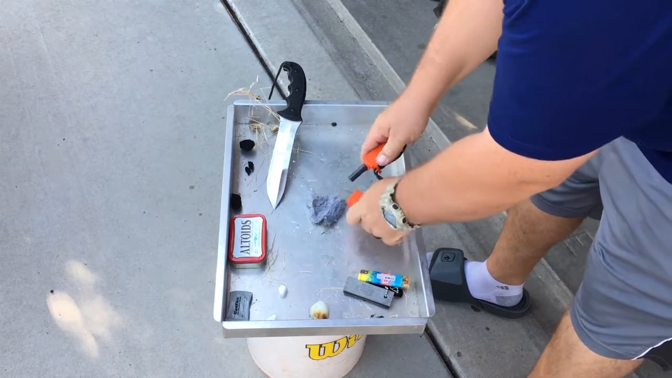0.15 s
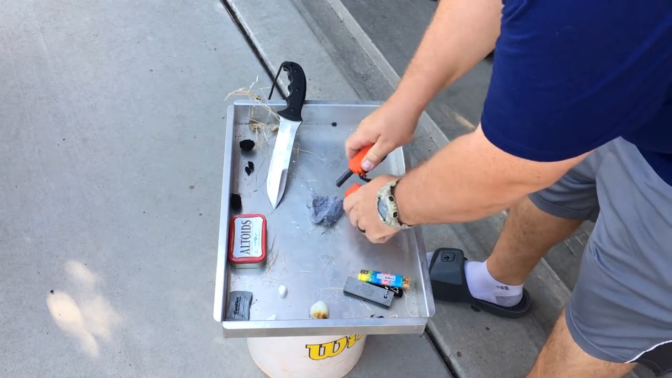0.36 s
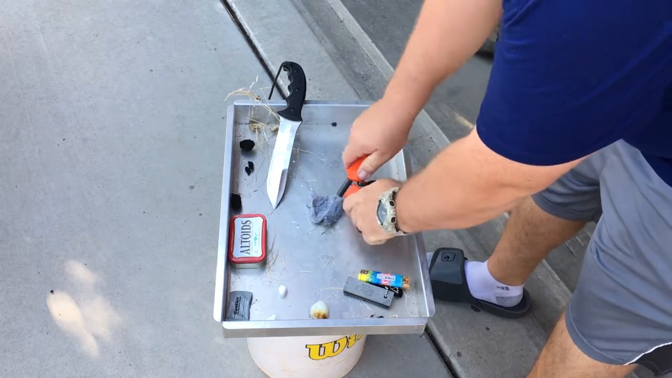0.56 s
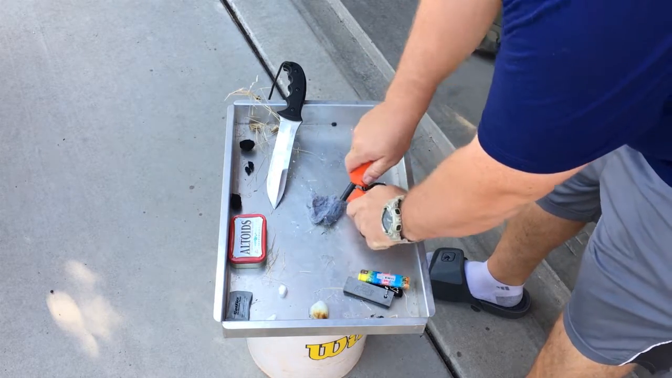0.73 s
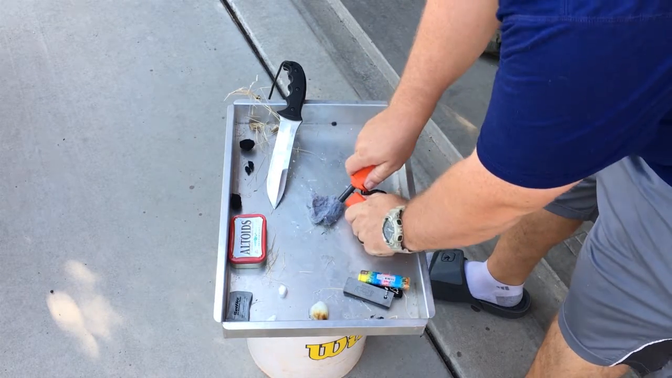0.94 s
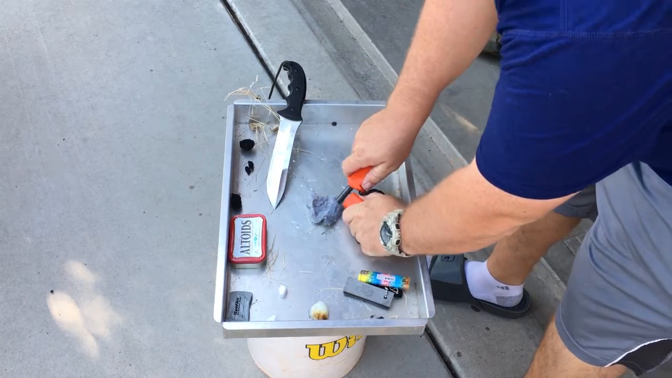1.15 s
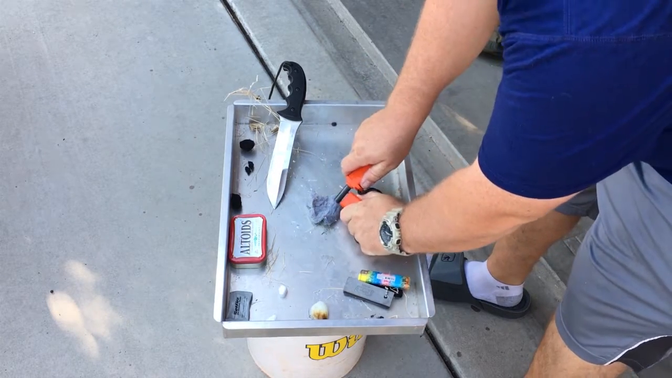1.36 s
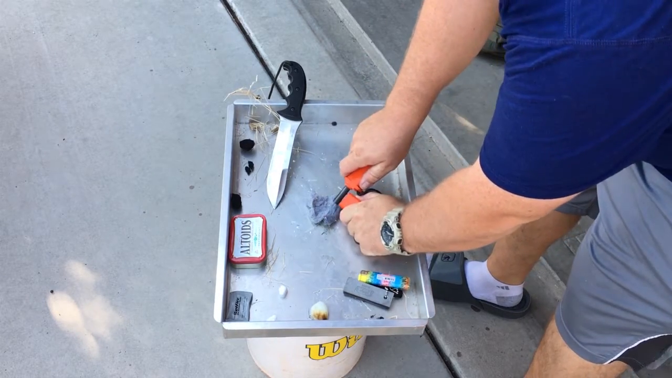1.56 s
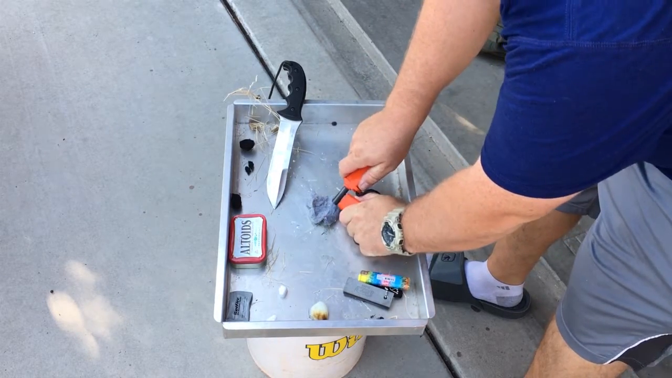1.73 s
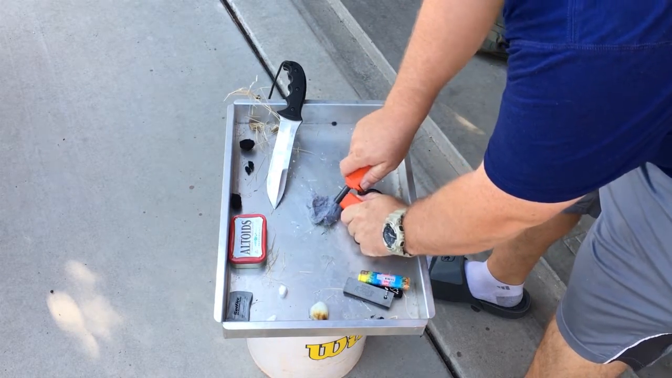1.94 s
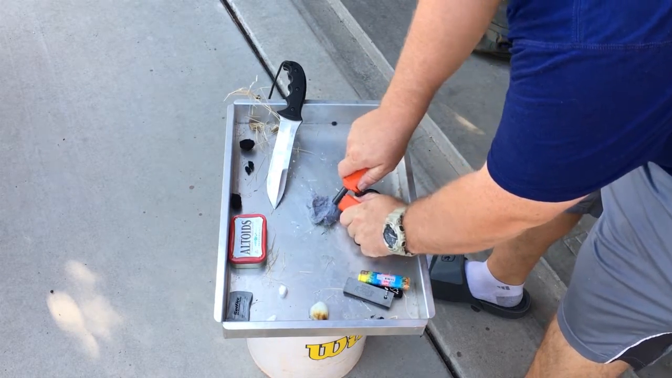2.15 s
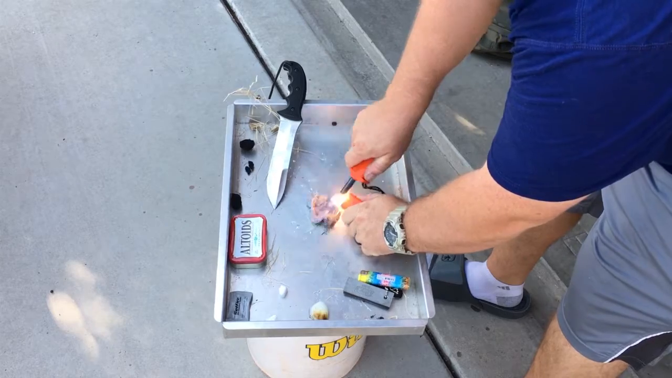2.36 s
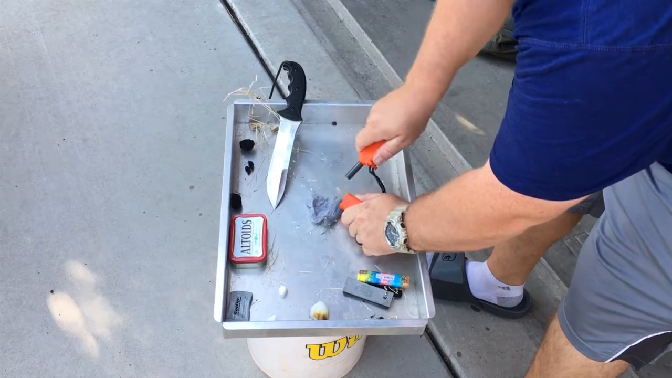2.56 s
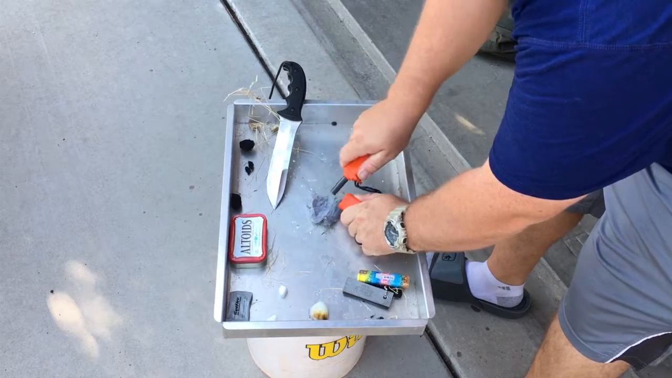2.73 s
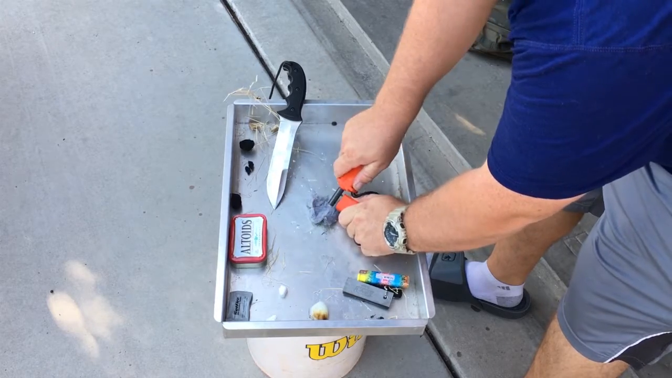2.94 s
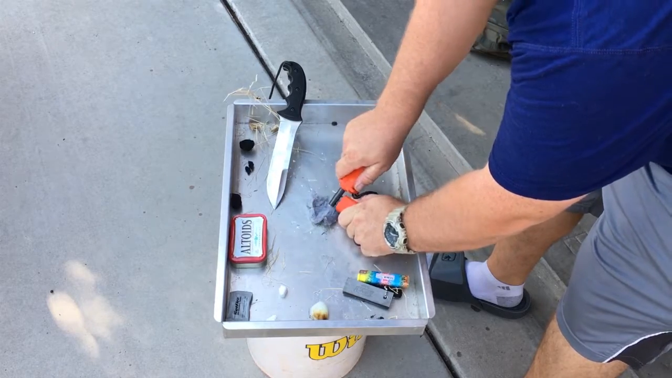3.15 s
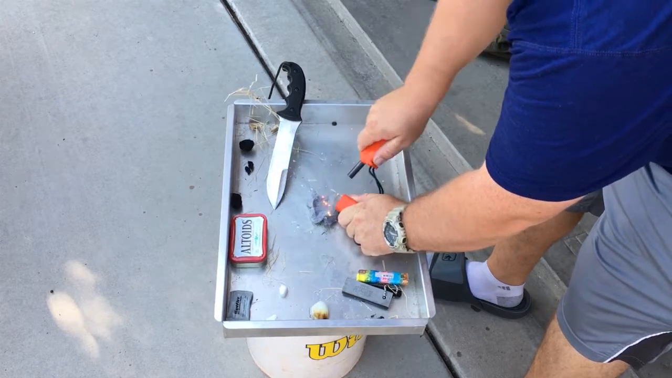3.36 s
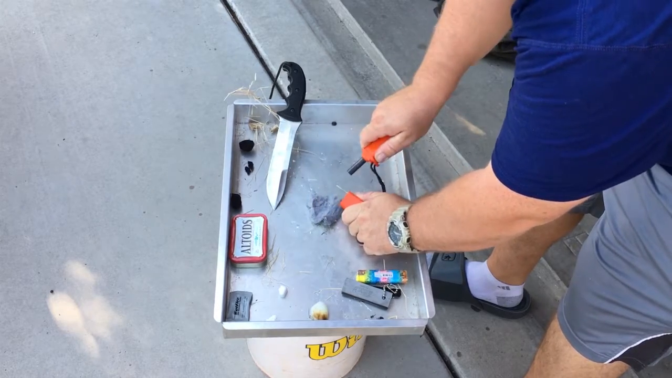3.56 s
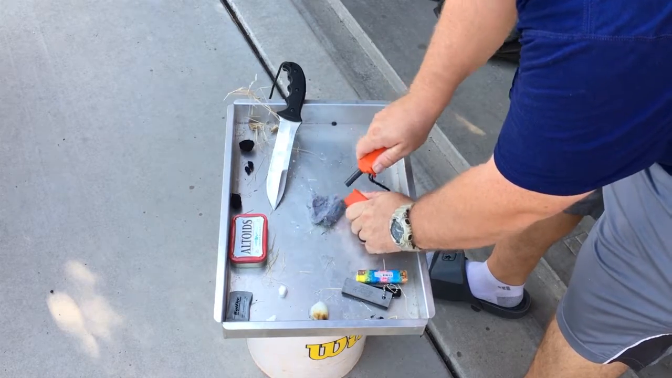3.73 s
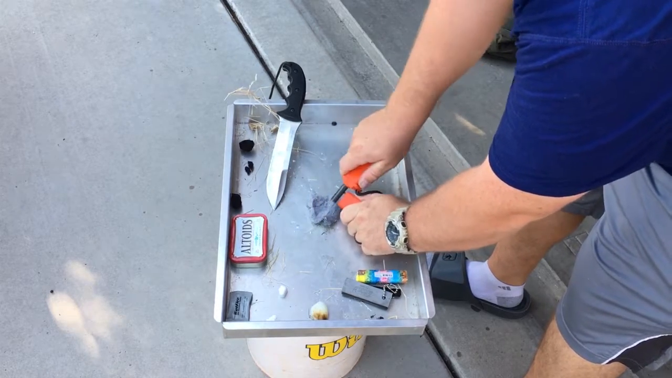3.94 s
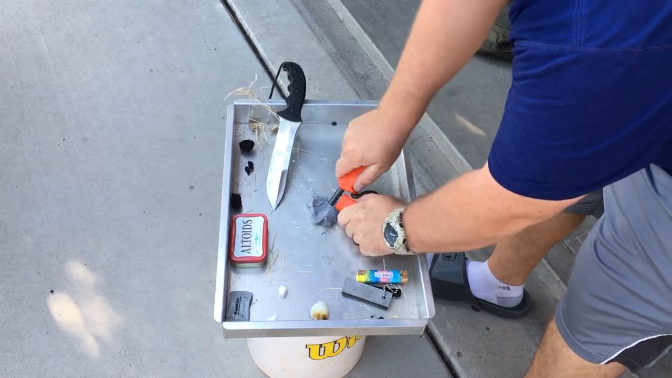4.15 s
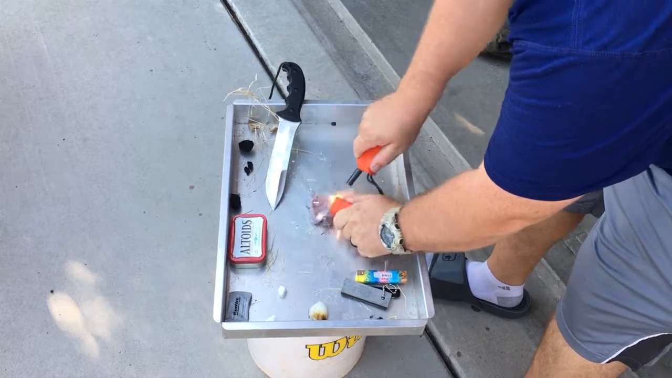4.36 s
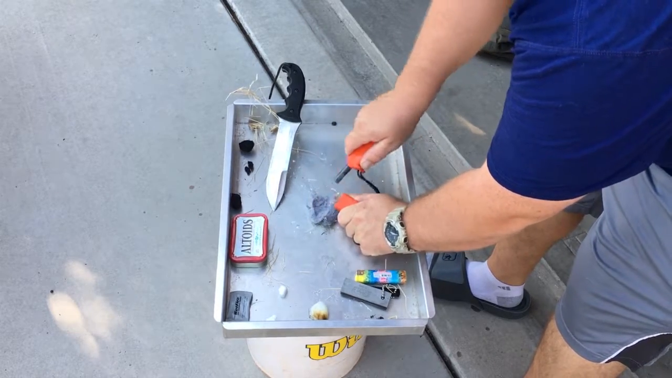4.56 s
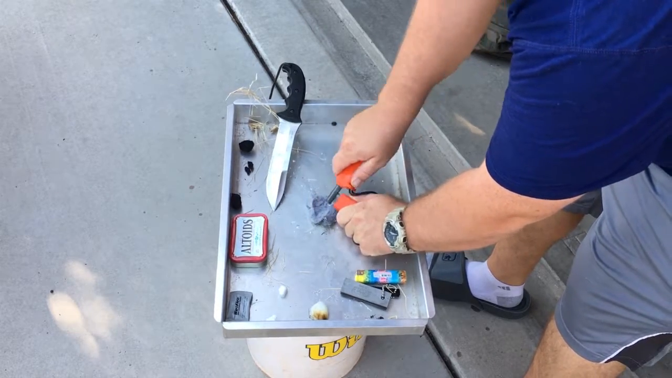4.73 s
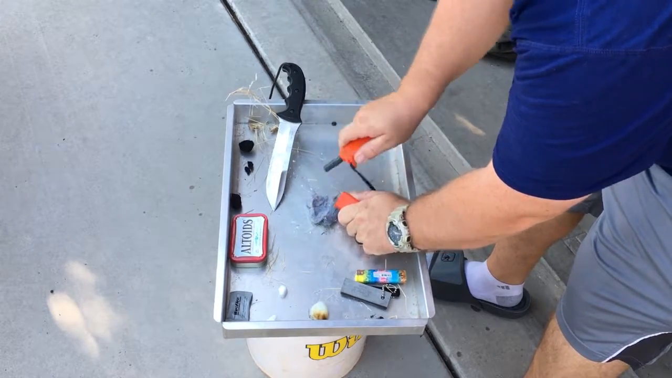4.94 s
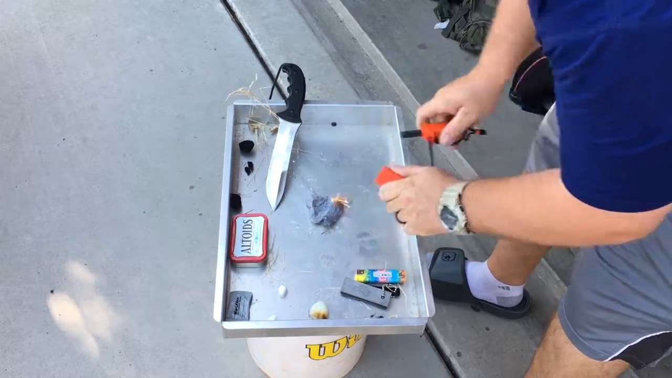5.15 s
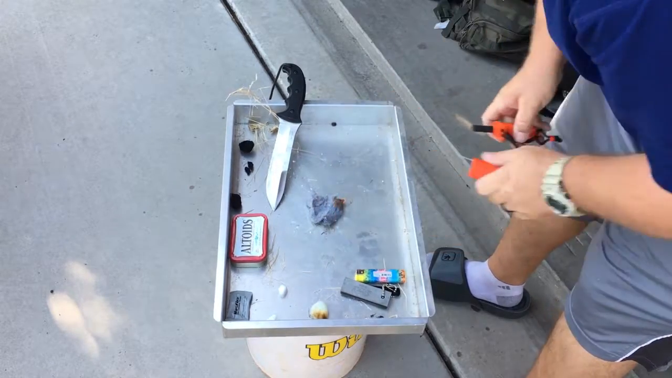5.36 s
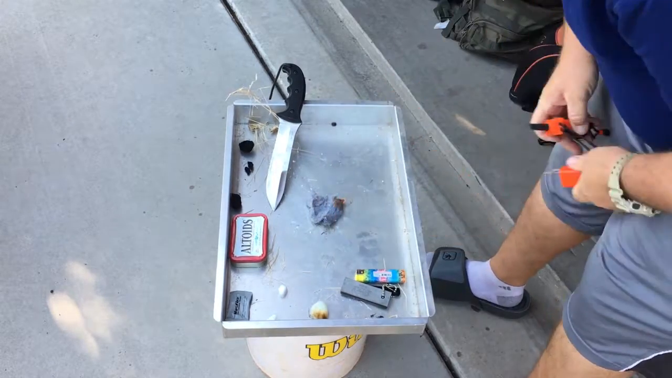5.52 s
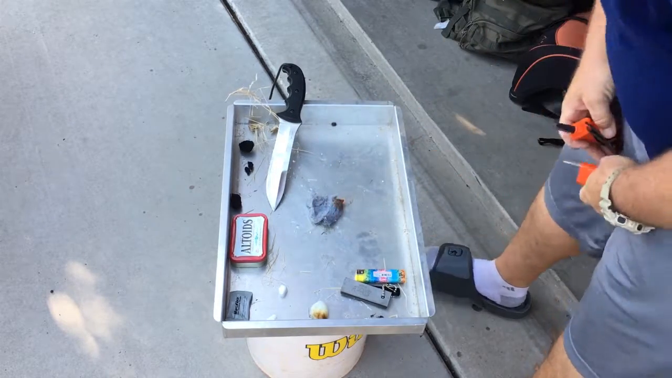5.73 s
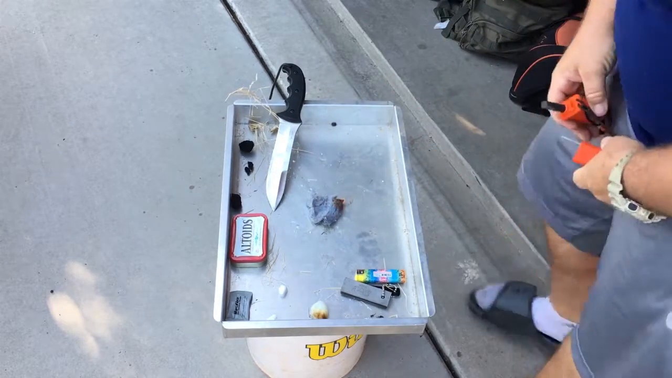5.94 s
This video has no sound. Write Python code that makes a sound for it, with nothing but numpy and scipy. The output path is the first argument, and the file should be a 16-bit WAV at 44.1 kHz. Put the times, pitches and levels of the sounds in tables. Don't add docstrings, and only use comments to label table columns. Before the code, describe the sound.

A blade chatters down a spark rod in three short rasps between sharp plastic knocks, a thin tray thudding softly, faint machine hum behind.

```python
import sys
import numpy as np
from scipy import signal
from scipy.fft import rfft, irfft
from scipy.io import wavfile
from scipy.ndimage import uniform_filter1d

SR = 44100
rng = np.random.default_rng(int(sys.argv[2]) if len(sys.argv) > 2 else 0)


def transcribe(signal):
    frames = np.atleast_2d(signal).T
    limited = np.clip(frames, -1, 1)
    pcm = np.round(limited * 32767).astype(np.int16)
    wavfile.write(sys.argv[1], SR, pcm)


def attenuation_scalar(level_db):
    decades = np.asarray(level_db, float) / 20
    return 10 ** decades


N = 268597


def noise(n):
    return rng.standard_normal(n)


def seconds(length_s):
    return np.arange(int(length_s * SR)) / SR


def unit(x):
    return x / np.sqrt(np.mean(x ** 2))


def peak_unit(x):
    return x / np.abs(x).max()


def colour(x, points):
    hz, db = np.transpose(points)
    bins = np.maximum(np.fft.rfftfreq(len(x), 1 / SR), 1)
    return irfft(rfft(x) * attenuation_scalar(np.interp(np.log(bins), np.log(hz), db)), len(x))


def resonate(x, hz, width_hz):
    return signal.lfilter(*signal.iirpeak(hz, hz / width_hz, SR), x)


def walk(rate):
    k = int(SR / rate)
    held = np.repeat(noise(N // k + 1), k)
    smooth = uniform_filter1d(uniform_filter1d(held, k), k)
    return unit(smooth[:N])


def grains(scatter_db):
    return unit(noise(N) * attenuation_scalar(scatter_db * rng.exponential(size=N)))


def add(out, s, x):
    i = int(s * SR)
    out[..., i:i + x.shape[-1]] += x[..., :N - i]


def ring(x, modes):
    return sum(attenuation_scalar(db + 4.0 * walk(120)) * resonate(x, hz, width) for hz, width, db in modes)


def striker():
    # f/Hz, width/Hz, level/dB
    blade_modes = [(1485, 46, -7), (2320, 105, -8), (3490, 280, -6.5), (4180, 21, -2), (5500, 190, -17),
                   (5770, 65, -8), (6300, 34, -22), (7000, 24, -11), (8310, 480, -8.5), (9080, 47, -4),
                   (9560, 82, 3), (11800, 20, -21)]
    # f/Hz, width/Hz, level/dB
    squeal_modes = [(3740, 84, 0), (4383, 57, 5), (4370, 36, -13)]
    # f/Hz, level/dB
    grit_spectrum = [(590, -52), (1000, -14.5), (1370, -1), (1630, -24), (2940, -10), (4390, -10),
                     (6630, -12), (9700, -10.5), (11700, -12), (12500, -34.5), (16200, -74), (22000, -120)]
    # f/Hz, level/dB
    pressed_spectrum = [(110, -31), (180, -1.5), (421, -11), (688, -10), (973, -6.5), (1450, -6),
                        (2330, -6), (2600, -32), (3380, -41), (5720, -120)]
    # f/Hz, level/dB
    rumble_spectrum = [(150, -28), (230, -6.5), (420, -11.5), (700, -3), (1000, -7), (1500, -12.5),
                       (2400, -11.5), (3500, -45), (6000, -73)]
    force, loose = contact(), brushing()
    grit = grains(1.2)
    hiss = unit(colour(grit, grit_spectrum)) * attenuation_scalar(1.5 * walk(200))
    blade = hiss + attenuation_scalar(6.5) * unit(ring(grit, blade_modes))
    out = force[3] * unit(ring(grit, squeal_modes))
    for k, gain_db, kind in ((0, -1.5, "low"), (1, 0.1, "high")):
        split = signal.butter(N=4, Wn=7000, btype=kind, fs=SR, output="sos")
        scrape = force[k] * unit(signal.sosfilt(split, blade))
        rustle = loose[k] * unit(signal.sosfilt(split, hiss))
        out += attenuation_scalar(gain_db) * (scrape + rustle)
    pressed = force[2] * attenuation_scalar(2.4 * walk(70)) * unit(colour(grains(1.9), pressed_spectrum))
    rumble = loose[2] * attenuation_scalar(3.3 * walk(60)) * unit(colour(grains(0.99), rumble_spectrum))
    return out + slips() + pressed + rumble


def contact():
    # start t/s, end t/s, first level/dB, last level/dB, squeal level/dB
    strokes = [
        (2.412, 2.489, -47.5, -38, 2.5),
        (3.324, 3.39, -44.5, -37.5, 0.5),
        (4.332, 4.362, -48, -56, -2),
        (4.368, 4.43, -40.5, -36.5, -2.5),
    ]
    # t/s, level/dB, tray level/dB, length/s
    touches = [(2.211, -65, -12, 0.031), (2.241, -58, -14, 0.0051), (2.264, -56, -5.5, 0.0093),
               (2.287, -59, -13, 0.012), (2.581, -63, 13, 0.0041), (3.068, -65, -5, .008),
               (3.107, -70, -8, 0.0051), (3.12, -66, -1.5, 0.019), (3.183, -55.5, -5, 0.0094),
               (3.202, -61, -5, 0.013), (3.227, -59, -7, 0.012), (3.591, -73, -10, 0.0046),
               (4.138, -61.5, 1, 0.009), (4.156, -58.5, -9, 0.011), (4.186, -61, -8, 0.024),
               (4.318, -67, -1, 0.0085), (5.034, -69, -8, 0.0067), (5.258, -67, -7, 0.027),
               (5.428, -70, -16, 0.0044), (5.807, -58, -16, 0.0023), (5.815, -69, -7, .012)]
    bite_s = 0.0038
    force = np.zeros((4, N))
    for start, end, first_db, last_db, squeal_db in strokes:
        along = np.linspace(0, 1, int((end - start) * SR))
        top_db = -9 + 5 * along
        tray_db = -15.5 + 10 * along
        fading_squeal_db = squeal_db - 7 * along ** 1.9
        parts_db = np.array([0 * along, top_db, tray_db, fading_squeal_db])
        stroke_db = first_db + (last_db - first_db) * along
        bite = np.minimum(along * (end - start) / bite_s, 1)
        add(force, start, bite * attenuation_scalar(stroke_db + parts_db))
    force = uniform_filter1d(force, size=41, axis=1) * attenuation_scalar(1.6 * walk(130))
    for s, db, tray_db, length in touches:
        t = seconds(length + 0.011)
        shape = np.minimum(t / 0.00048, 1) * np.exp(-np.maximum(t - length, 0) / 0.0013)
        parts_db = np.array([0, -11.5, tray_db, -5.5])[:, None]
        add(force, s, attenuation_scalar(db + parts_db) * shape)
    return force


def brushing():
    # t/s, rustle level/dB, tray level/dB, time to fade by 60 dB/s
    brushes = [(2.489, -49, -2.5, 0.23), (2.578, -58.5, 7, 0.12), (3.39, -47, 1, 0.17),
               (3.453, -46, -2.5, 0.12), (3.487, -61.5, 4, 0.14), (3.525, -65, -3, 0.14),
               (4.431, -46, 2.5, 0.15), (4.478, -54, -1, 0.33)]
    loose, t = np.zeros((3, N)), seconds(.3)
    for s, db, tray_db, t60 in brushes:
        fall = -60 * t / t60
        parts_db = np.array([fall, -16.5 + fall, tray_db + fall / 1.31])
        add(loose, s, np.minimum(t / 0.0036, 1) * attenuation_scalar(db + parts_db))
    return loose


def slips():
    # t/s, peak level/dB, centre f/Hz, width/Hz
    slip_events = [
        (2.4827, -20, 6700, 3910),
        (3.384, -28, 6400, 4000),
        (4.4255, -21.5, 5620, 2500),
    ]
    out, t = np.zeros(N), seconds(0.033)
    for s, db, hz, width in slip_events:
        crack = resonate(noise(len(t)) * np.exp(-(t / 0.0029) ** 2), hz, width)
        crack = resonate(crack, hz, 0.84 * width)
        add(out, s, attenuation_scalar(db) * peak_unit(crack))
    return out


def snaps():
    # t/s, peak level/dB, hollow level/dB, shell level/dB, thin edge level/dB
    knocks = [
        (0.497, -12.5, 0, -2, -2),
        (2.9233, -11, -1, -0.5, 2),
        (3.9591, -15, 1.5, 1.5, 1),
        (4.861, -15, -2.5, 0, 0.5),
    ]
    # f/Hz, width/Hz, level/dB, share in the echo/dB
    handle_parts = [
        (2050, 700, -9, -2),
        (3650, 520, -5.5, -1.5),
        (6800, 1300, -0.5, -4),
        (9250, 1200, -5, -12),
    ]
    out, t = np.zeros(N), seconds(.4)
    chatter = np.exp(-np.maximum(t - .0006, 0) / .00045) + attenuation_scalar(-8) * np.exp(-t / .0028)
    push = np.minimum(t / .0003, 1) * chatter
    click = attenuation_scalar(13.5) * signal.unit_impulse(len(t), idx=24)
    fade = attenuation_scalar(-27 - 60 * t / 0.26) * np.clip(t / 0.00223, 0, 1)
    soft = signal.butter(N=8, Wn=10100, fs=SR, output="sos")
    for s, peak_db, hollow_db, shell_db, edge_db in knocks:
        crack = resonate(resonate(push * noise(len(t)), 5800, 6000), 5800, 7000)
        knock = attenuation_scalar(-9.5) * peak_unit(crack)
        smear = attenuation_scalar(-14.5) * unit(resonate(noise(len(t)), 5500, 6000))
        grips_db = (hollow_db, shell_db, 0, edge_db)
        for (hz, width, own_db, wet_db), grip_db in zip(handle_parts, grips_db):
            db = own_db + grip_db
            part = resonate(click + push * noise(len(t)), hz, 1.3 * width)
            part = resonate(part, hz, 1.3 * width)
            knock = knock + attenuation_scalar(db) * peak_unit(part)
            smear = smear + attenuation_scalar(db + wet_db) * unit(resonate(noise(len(t)), hz, 0.75 * width))
        knock = signal.sosfilt(soft, knock)
        add(out, s - .0005, attenuation_scalar(peak_db + 1.5) * (knock + fade * smear) / np.abs(knock).max())
    return out


def linger():
    # knock t/s, f/Hz, level/dB, time to fade by 60 dB/s
    handle_ring = [(0.496, 4000, -46, 0.25), (.497, 1470, -43.5, 0.08), (.497, 5030, -27, 0.024),
                   (3.957, 3160, -40, 0.087), (3.96, 6450, -45.5, 0.19)]
    out, t = np.zeros(N), seconds(.4)
    for s, hz, db, t60 in handle_ring:
        tone = resonate(resonate(noise(len(t)), hz, 130), hz, 300)
        add(out, s, attenuation_scalar(db - 60 * t / t60) * unit(tone))
    return out


def tray():
    # t/s, peak level/dB, f/Hz
    bumps = [(2.489, -45, 690), (2.539, -55, 236), (2.581, -56, 210), (2.618, -46.5, 630),
             (3.399, -41.5, 200), (3.455, -36, 730), (3.486, -40.5, 210), (3.528, -47, 200.4),
             (4.439, -47, 660), (4.489, -46, 259), (5.098, -38.5, 254.5), (5.144, -41.5, 245),
             (5.245, -49, 235), (5.295, -48.5, 270)]
    out, t = np.zeros(N), seconds(.12)
    for s, db, hz in bumps:
        blow = noise(len(t)) * t * np.exp(-t / 0.004)
        thud = resonate(resonate(blow, hz, hz / 5), hz, hz)
        add(out, s - .002, attenuation_scalar(db - 5) * peak_unit(thud))
    return out


def sandal():
    # f/Hz, level/dB
    sole_spectrum = [(410, -39), (700, -11), (1730, -2), (1860, -1.5), (2400, -8.5), (3610, 2),
                     (5920, -4.5), (8710, -1), (11200, -6), (12500, -26), (16200, -60), (22000, -120)]
    scuff_s, hold_s, rise_db_s, fall_db_s = 5.914, 0.03, 420, 552
    t = np.arange(N) / SR - scuff_s
    db = -47.5 + rise_db_s * np.minimum(t, 0) - fall_db_s * np.maximum(t - hold_s, 0)
    return attenuation_scalar(db + 3.3 * walk(60)) * unit(colour(grains(2.7), sole_spectrum))


def cloth():
    middle_s, width_s = 5.35, 0.95
    t = np.arange(N) / SR
    swell = np.exp(-((t - middle_s) / width_s) ** 2)
    return attenuation_scalar(-77.5 + 1.8 * walk(25)) * swell * unit(resonate(grains(2.4), 4600, 7000))


def echo(x):
    t60_s, echo_db = 0.23, -14.5
    t = seconds(.4)
    tail = noise(len(t)) * attenuation_scalar(-60 * t / t60_s) * np.clip(t / 0.0019, 0, 1)
    tail = resonate(tail, 3800, 9000)
    tail = tail / np.sqrt(np.sum(tail ** 2))
    return x + attenuation_scalar(echo_db) * signal.fftconvolve(x, tail)[:len(x)]


def drones():
    # f/Hz, level/dB, from t/s, to t/s
    engines = [(56.9, -58.5, -1.5, 2.24), (55.5, -53.5, 1.5, 6.2), (101.3, -52, 0, 1.46),
               (87.6, -56, 2.6, 6.2), (113.5, -54, 0, 1.38), (115.5, -52, 3, 5.7)]
    t, out = np.arange(N) / SR, 0
    rev_hz = 126.7 + 13 * np.exp(-((t - 2.4) / 0.49) ** 2)
    for hz, db, start, end in engines + [(rev_hz, -59.5, 0, 3.2)]:
        phase = 2 * np.pi * np.cumsum(hz * (1 + 0.00811 * walk(2.5))) / SR
        heard = np.clip(np.minimum(t - start, end - t) / .15 + .5, 0, 1)
        out = out + heard * attenuation_scalar(db + 2.18 * walk(4.9)) * np.sin(phase + 0.21 * walk(8))
    return out


def background():
    # f/Hz, level/dB
    air_spectrum = [(12, -56.5), (20, -15.5), (44, 1), (110, -2), (144, -4), (169, -17), (216, -12.5),
                    (261, -23), (342, -23), (392, -30), (881, -29), (1070, -32), (1290, -29), (8550, -49),
                    (12800, -56.5), (16700, -88), (22000, -120)]
    # f/Hz, width/Hz, level/dB (level unused)
    air_peaks = [(99.5, 80, 0), (596.4, 30, -26), (1090, 96, -23), (1837, 26.7, -30), (2254, 120, -31)]
    # f/Hz, level/dB
    whines = [(597.5, -89.5), (689.1, -80.5), (1034, -76.5), (1093, -76.5), (1147, -84), (1362, -78.5)]
    # t/s, level/dB
    hum_swell = [(0, -49.5), (1.2, -50), (1.7, -49.5), (2.7, -49), (3.32, -52.5), (3.65, -48.5),
                 (4.2, -55.5), (6.09, -53)]
    swell_s, swell_db = np.transpose(hum_swell)
    t = np.arange(N) / SR
    air = colour(noise(N), air_spectrum)
    air = air + sum(attenuation_scalar(-0.5) * resonate(air, hz, width) for hz, width, db in air_peaks)
    hum = signal.sosfiltfilt(signal.butter(N=3, Wn=170, fs=SR, output="sos"), air)
    step_hz = 2500
    hiss = colour(air - hum, [(step_hz, 0), (1.06 * step_hz, -1.5), (3.5 * step_hz, 0)])
    whine = 0
    for hz, db in whines:
        tone = np.sin(2 * np.pi * hz * t + 2.05 * walk(6))
        whine = whine + attenuation_scalar(db + 2.5 + 2.86 * walk(4.1)) * tone
    hum_db = np.interp(t, swell_s, swell_db) + 1.66 * walk(7.2)
    hiss_db = -59.5 + 0.81 * walk(3.53)
    return attenuation_scalar(hum_db) * unit(hum) + attenuation_scalar(hiss_db) * unit(hiss) + whine


def scene():
    near = echo(striker() + tray() + sandal()) + snaps()
    return (near + linger() + cloth() + drones() + background())[None]


def band_limit(x):
    return signal.sosfilt(signal.butter(12, 12970, fs=SR, output="sos"), x)


def record(dry):
    thin = signal.sosfilt(signal.butter(N=2, Wn=36, btype="high", fs=SR, output="sos"), dry)
    mix = signal.sosfilt(signal.ellip(N=7, rp=.5, rs=50, Wn=11950, fs=SR, output="sos"), thin)
    return band_limit(mix)


dry = scene()
out = record(dry)
transcribe(out)
```